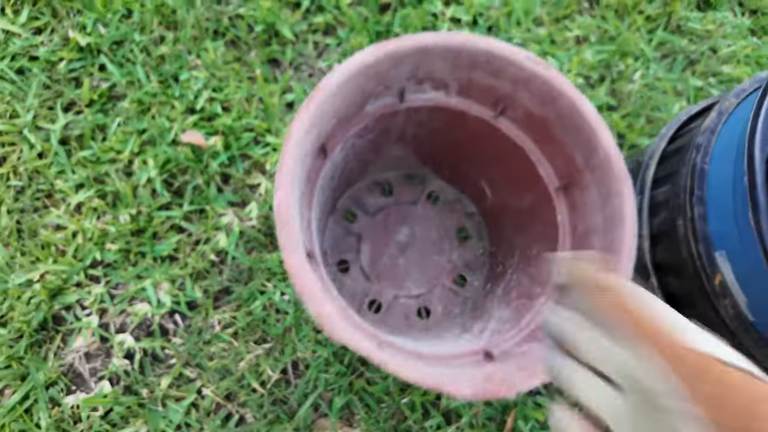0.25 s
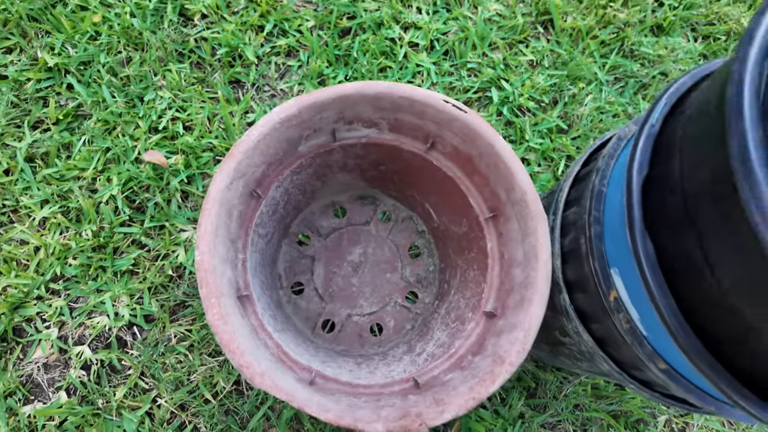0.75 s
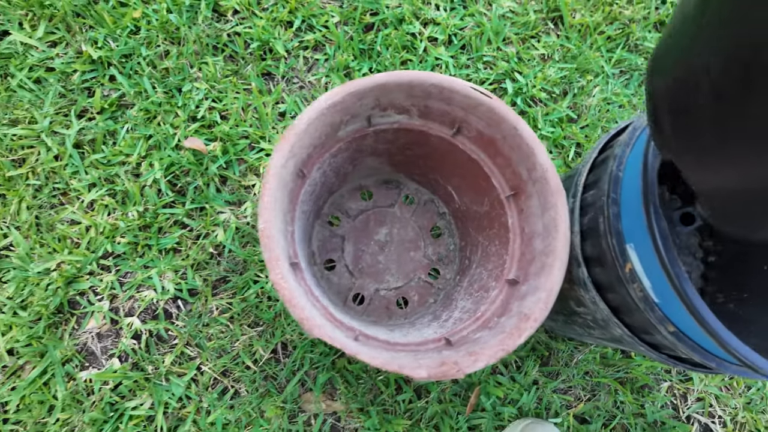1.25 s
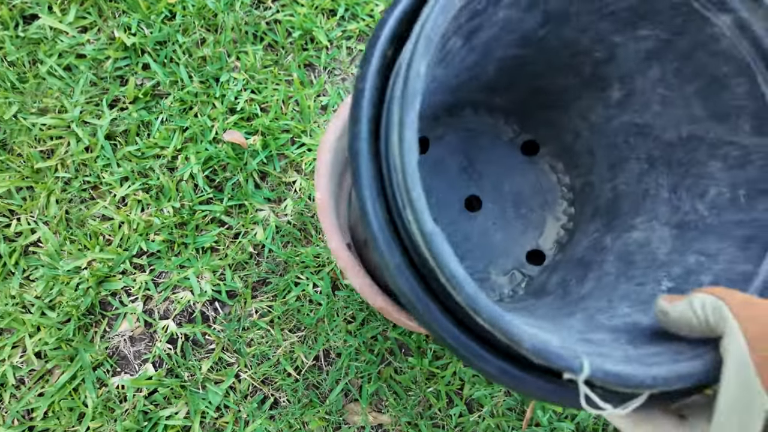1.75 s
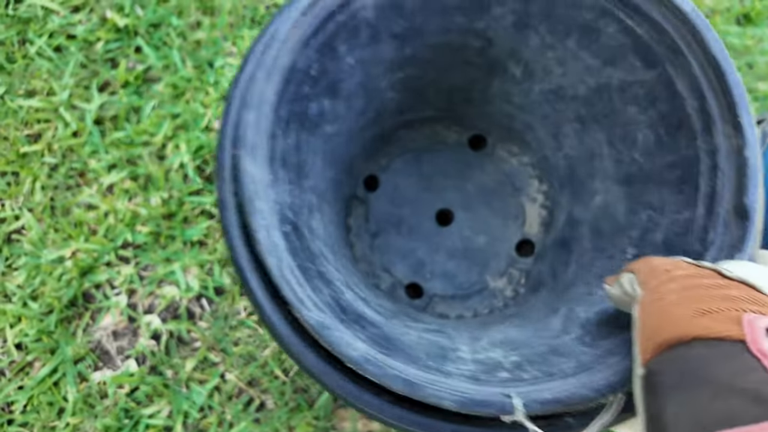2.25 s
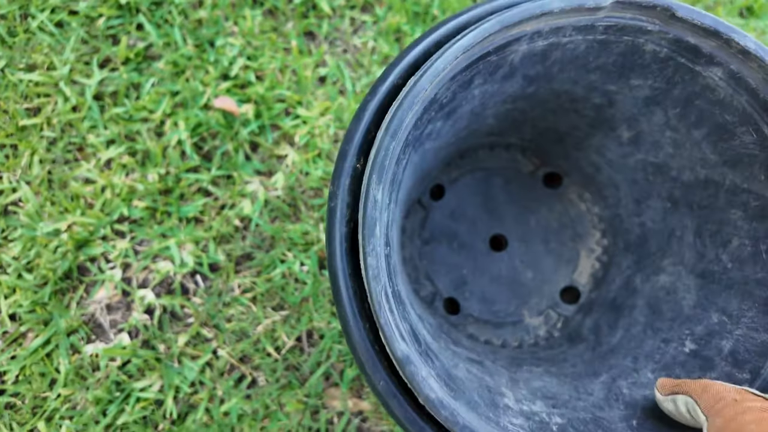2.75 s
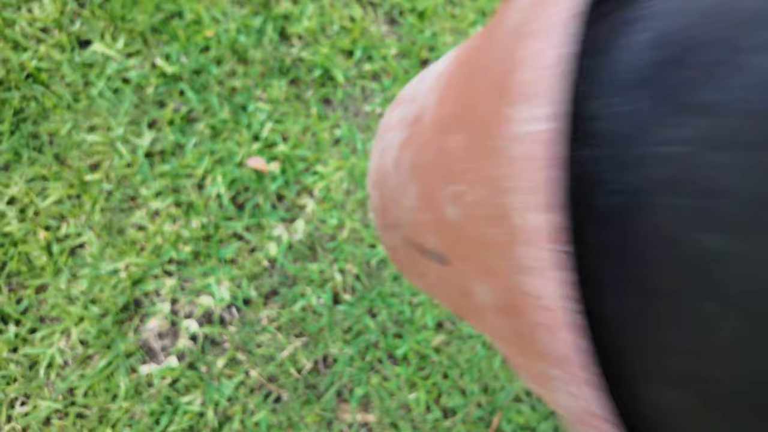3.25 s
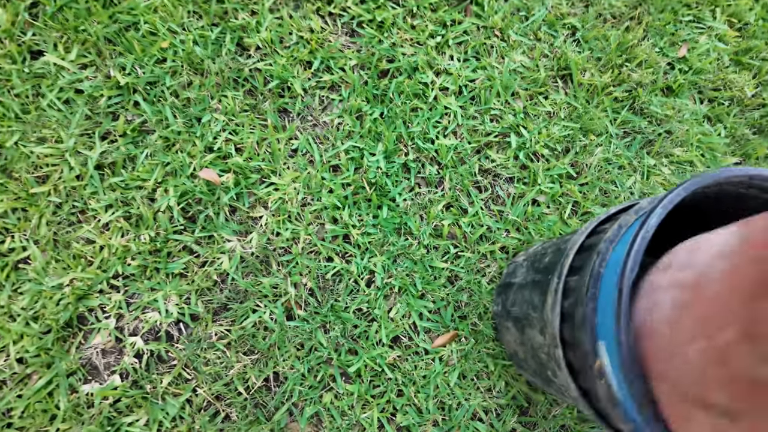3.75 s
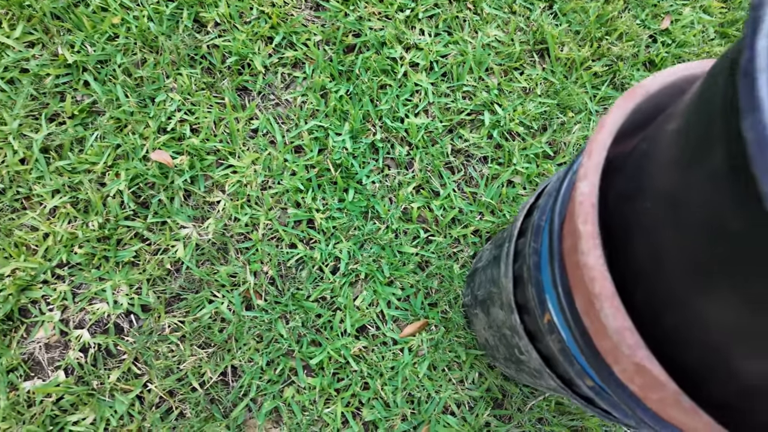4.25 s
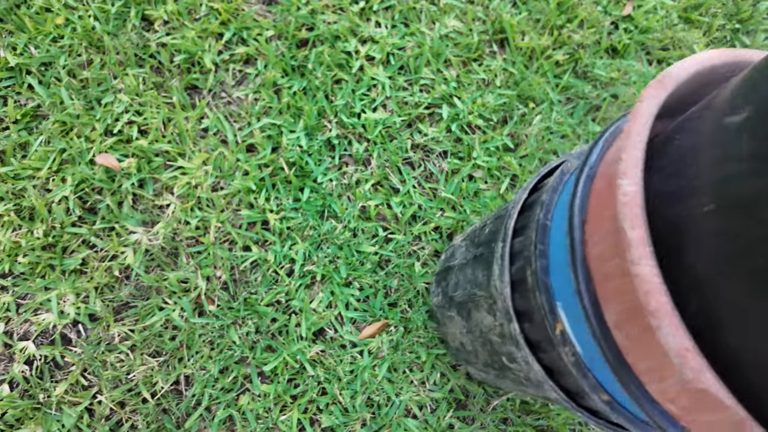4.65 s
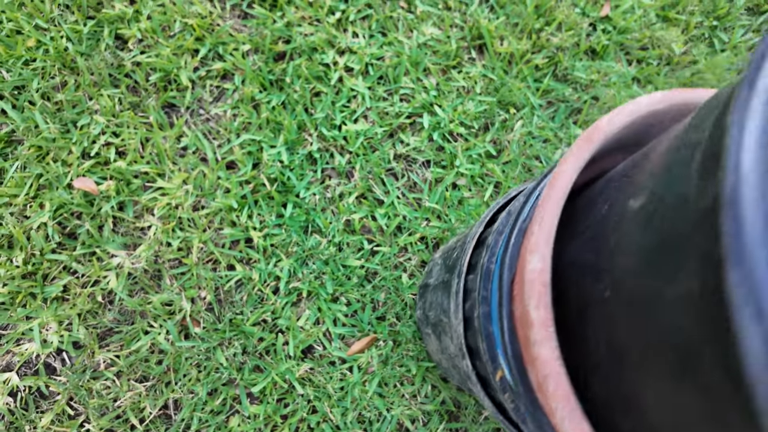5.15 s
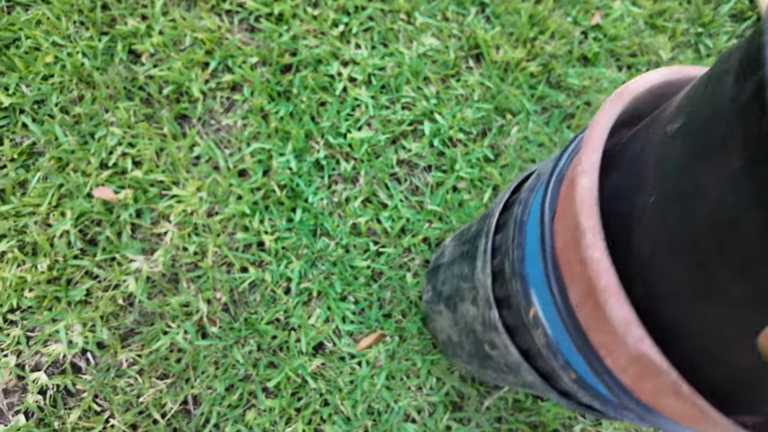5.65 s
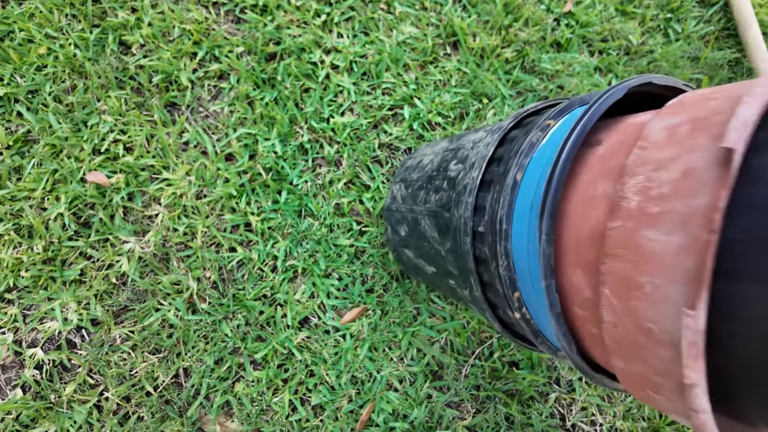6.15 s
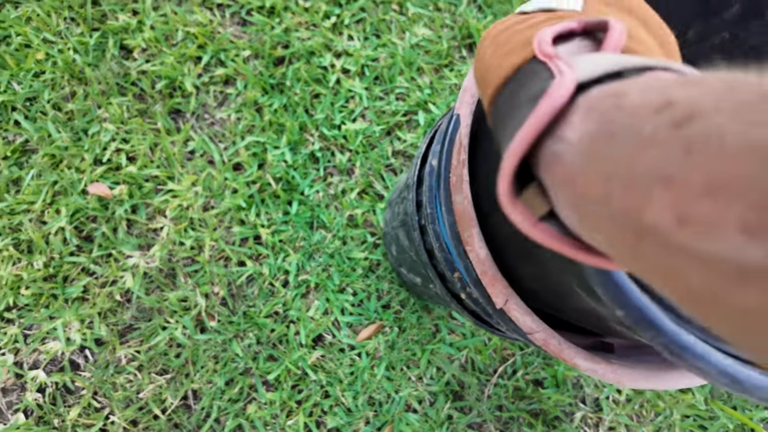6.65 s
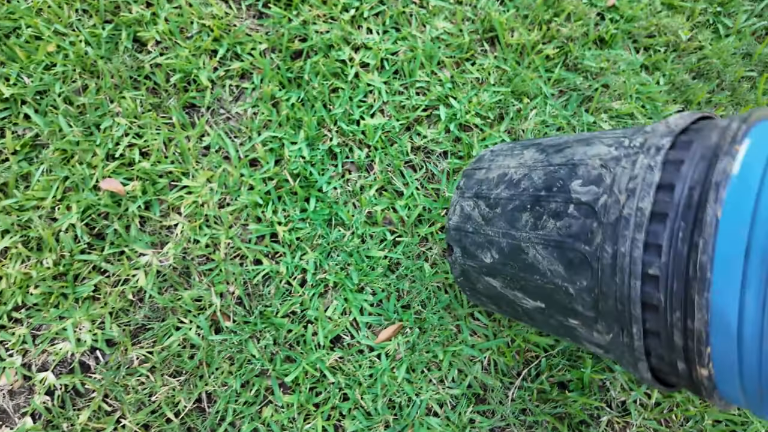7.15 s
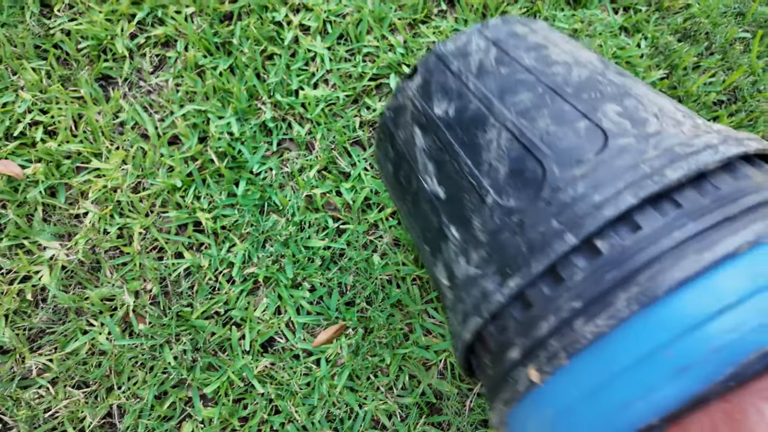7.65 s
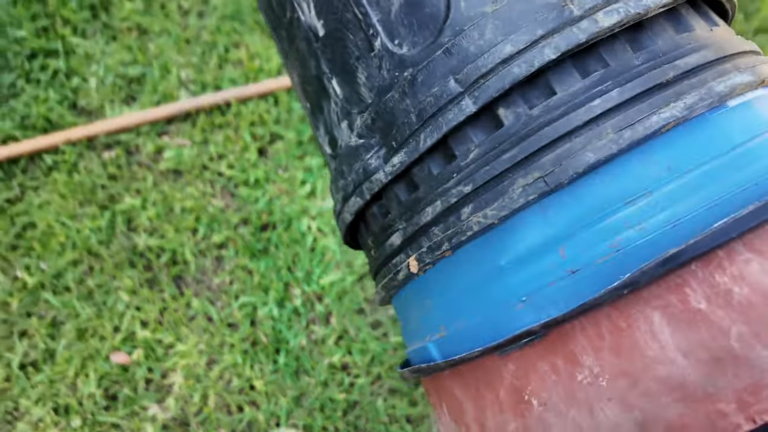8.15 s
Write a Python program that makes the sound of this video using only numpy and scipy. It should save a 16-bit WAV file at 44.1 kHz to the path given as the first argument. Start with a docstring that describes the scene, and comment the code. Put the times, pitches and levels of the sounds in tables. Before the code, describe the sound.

Outdoors on a lawn, closely heard, with a soft distant hum, light low wind and faint gliding bird notes. From 0 to 0.6 s plastic pots scuff and knock quietly. Around 0.9-1.2 s gritty scraping grows with small clacks. At 1.7-1.8 s a pot lands in another: a loud sandy clatter and hollow double boom. Short scrapes with duller knocks follow at 2.2, 2.7 and 3.0 s. Birds chirp faintly around 3.2-3.6 s. At 3.8-4.0 s comes the harshest nesting crash, bright rasp, rim knocks and boom, jolting the microphone. Then it is quiet, with faint rubs and bird notes, until a scrape and hollow knock at 5.3 s. A scrape at 6.0 s leads to a sharp, loud crack and boom at 6.3 s, then fading rustle and ticks. Low wind thuds flutter at 7.1-7.5 s; small dull flicks at 7.7-7.9 s and faint rustling end it.

```python
"""A lawn: gloved hands pull gritty plastic plant pots apart and nest them into a stack.
Walls scrape as grit-driven noise, rims knock and flick as ringing noise and tones, hollow pots boom in
two air modes. Light wind buffets the microphone as low noise and short thuds, over a far outdoor hum of
coloured noise and a few faint, gliding bird notes."""
import sys
import numpy as np
from scipy import signal
from scipy.fft import rfft, irfft
from scipy.io import wavfile
from scipy.ndimage import uniform_filter1d

SR = 44100
rng = np.random.default_rng(int(sys.argv[2]) if len(sys.argv) > 2 else 0)


def dump(signal):
    """Clip the signal to [-1, 1] and save it as 16-bit WAV at the path in sys.argv[1]."""
    limited = np.clip(np.atleast_2d(signal).T, -1, 1)
    pcm = np.round(limited * 32767).astype(np.int16)
    wavfile.write(sys.argv[1], SR, pcm)


def invert_db(level):
    """Linear amplitude ratio for a level in decibels (20 dB per decade), elementwise."""
    return 10 ** (np.asarray(level, dtype=float) / 20)


N = 370873  # length in samples

# Pot walls sliding on each other, a row a stroke; swell and fade each span STROKE_DB.
# Each row: peak time in seconds, level in dB, swell in seconds, fade in seconds, treble tilt in dB per octave.
STROKES = [(0.05, -60.5, 0.33, 0.41, -.6), (0.19, -42, 0.05, 0.11, 3.5), (0.319, -53, 0.11, .08, 5),
           (0.4, -55.5, 0.14, 0.2, 4), (0.59, -49.5, 0.069, .1, 2), (0.66, -58.5, 0.12, 0.35, 2.5),
           (0.84, -46, .1, 0.45, 3.5), (0.935, -41.5, 0.026, 0.15, 1), (0.98, -40, 0.11, 0.052, 2.5),
           (1.031, -34.5, 0.066, 0.018, 0), (1.095, -40, 0.047, 0.2, 2), (1.15, -46.5, 0.12, .05, 2),
           (1.2, -44, .04, 0.024, -2), (1.47, -57.5, 0.26, 0.53, 2.5), (1.703, -27, 0.012, 0.044, 4),
           (1.729, -36, 0.031, 0.014, 2), (1.785, -31, 0.015, 0.14, 2.5), (1.85, -36, 0.15, 0.041, 7),
           (2.0, -51, 0.11, .25, 2), (2.227, -36, 0.063, 0.12, 2), (2.33, -43, 0.11, 0.14, 1.5),
           (2.49, -51, 0.076, .2, 2), (2.725, -36, 0.035, 0.12, 2.2), (2.772, -34.5, 0.11, 0.031, 1),
           (2.823, -46.5, 0.075, 0.038, -3), (2.995, -50, 0.13, 0.11, -1), (3.36, -65.5, 0.54, 0.27, 1),
           (3.62, -60.5, 0.11, 0.15, 0), (3.721, -55, 0.045, 0.26, 2.2), (3.81, -55.5, 0.23, 0.054, 1),
           (3.852, -33.5, 0.02, 0.03, 2), (3.894, -34.5, 0.013, 0.063, 12.5),
           (3.916, -25, 0.024, 0.094, 4.5), (3.97, -29.5, 0.042, 0.051, 4), (4.014, -42.5, 0.045, 0.036, 4),
           (4.11, -62.5, 0.078, 0.57, 12.5), (4.32, -57, 0.23, 0.072, 6), (4.47, -54, 0.18, 0.068, 6),
           (4.7, -62.5, 0.32, 0.25, 7.5), (4.909, -58.5, 0.14, 0.2, 11), (5.113, -65.5, 0.3, 0.45, 10.5),
           (5.311, -35, 0.07, 0.061, 3.5), (5.37, -50.5, 0.045, 0.19, 4.5), (5.62, -65, 0.6, 0.11, 9),
           (5.88, -64.5, 0.75, 0.17, 5.5), (6.016, -38, 0.067, 0.11, 3.5), (6.13, -46, 0.18, 0.073, 8),
           (6.269, -37.5, 0.022, 0.021, 6), (6.305, -41.5, 0.032, 0.047, 6.5),
           (6.376, -46, 0.11, 0.049, 0.3), (6.52, -45, 0.13, 0.19, 5), (6.62, -51, 0.18, 0.14, 5),
           (6.7, -60.5, 0.11, 0.78, 3), (7.144, -66.5, 0.45, 0.28, 12), (7.42, -67, 0.32, 0.31, 5),
           (7.59, -59, 0.16, 0.14, 3.5), (7.69, -56, 0.14, 0.16, 7), (7.81, -61, 0.26, 0.53, 3),
           (8.171, -60.5, 0.3, 0.28, 9.5), (8.4, -57.5, 0.38, .1, 3.5)]
STROKE_DB, STROKE_POWER = 25.5, 1.31  # the level drops as this power of the time from the peak
REST_DB, REST_TILT_DB = -75, -4  # faint rustle of the grip between strokes: level, tilt per octave

# Which pots meet and how deep they nest.
# Each row: time in seconds, wall body under 1 kHz in dB, air in the pot in dB, both against the rub.
NESTING = [(0.0, 7.5, 11), (0.6, 11.5, 23), (0.85, 7, 22.5), (0.95, -4, 15), (1.2, 3, 26), (1.7, 13.5, 31),
           (2.3, 3.5, 28.5), (2.75, 9.5, 26.5), (3.0, 2, 32), (3.9, 6.5, 27.5), (4.4, 7, 25.5),
           (5.1, 7, 11), (5.3, 11.5, 28.5), (6.05, 7.5, 17), (6.55, 10.5, 28), (7.7, -2, 8), (8.41, 8, 27)]

# The patch of wall that the rub excites most.
# Each row: time in seconds, centre in Hz, level of its added peak in dB against the wall around it.
PATCHES = [(0.0, 1300, 4), (0.6, 1600, 2), (0.82, 4170, -19), (1.22, 4180, -2), (1.5, 1630, -3.8),
           (1.9, 1320, -9), (2.3, 2130, -19), (2.75, 1400, -26), (3.9, 1550, -8), (4.25, 2030, 13.5),
           (4.5, 2090, 4), (5.1, 1330, 21.5), (5.3, 1270, -1), (6.1, 3450, -15), (6.55, 1430, -2),
           (7.6, 2740, -4), (7.85, 1190, 9), (8.41, 2030, -4)]

# Average colour of the pot wall. Each row: frequency in Hz, relative density in dB per Hz.
WALL = [(260, -79), (450, -12), (515, -7), (830, -2), (1020, -11.5), (1260, -1.5), (1750, -3), (2010, -4),
        (2290, -3.5), (2550, -5.5), (3490, -6), (4910, -10.5), (6930, -18.5), (10400, -17), (16000, -23.5)]

# Air inside a pot, lower and upper mode. Each row: centre in Hz, width in Hz.
AIR_MODES = [(130, 56), (290, 84)]

# Rims crashing and skidding.
# Each row: time in seconds, nominal peak in dB, ring in Hz, rise in seconds, 60 dB decay in seconds.
KNOCKS = [(0.16, -21.5, 1160, 0.017, 0.29), (0.199, -23.5, 1320, 0.021, 0.1),
          (0.316, -22, 1160, .0096, 0.22), (0.563, -28, 2580, .003, .12), (0.864, -25.5, 650, .011, 0.36),
          (0.927, -20.5, 1560, .006, 0.53), (1.021, -13.5, 1740, 0.0036, 0.051),
          (1.061, -17, 1630, 0.003, 0.033), (1.082, -15, 1800, 0.0024, .054),
          (1.188, -14, 1500, 0.0025, 0.076), (1.693, -5, 1350, 0.0034, 0.089),
          (1.717, -12, 1380, 0.0066, .037), (1.76, -3, 800, 0.0035, 0.086),
          (1.779, -8.5, 720, 0.0045, 0.21), (2.212, -16.5, 950, .005, 0.1),
          (2.468, -22, 2640, 0.0049, 0.071), (2.699, -33, 756, .011, .12), (2.716, -9.5, 490, 0.01, 0.036),
          (2.98, -22.5, 890, 0.0022, 0.097), (3.047, -27, 750, .007, 0.089), (3.835, -8, 3430, .003, 0.065),
          (3.848, -11, 3660, 0.0041, .048), (3.886, -10, 3560, 0.0035, 0.53),
          (3.906, -4, 1280, 0.0033, 0.14), (3.918, -8, 1250, .003, 0.068), (3.956, -3, 570, 0.0032, 0.094),
          (4.003, -7.5, 1410, 0.0056, 0.045), (4.289, -43, 2100, 0.03, 0.63),
          (4.439, -33.5, 2220, 0.026, 0.37), (5.058, -34.5, 1000, 0.036, 0.43),
          (5.24, -31, 650, 0.0084, 0.27), (5.292, -13.5, 1270, .006, .11), (5.311, -13, 1530, 0.0081, 0.1),
          (5.973, -26, 1380, 0.014, 0.25), (6.011, -18.5, 1290, 0.013, 0.2), (6.089, -23, 4670, .011, 0.4),
          (6.261, -15, 950, 0.0026, 0.11), (6.271, -12.5, 4230, 0.0031, 0.034),
          (6.318, -1, 1360, 0.0025, 0.057), (6.329, -6.5, 2660, 0.0025, 0.053), (6.514, -27, 780, .01, .1),
          (7.802, -42, 1170, 0.034, 0.15)]
CREST_DB = 17.5  # nominal peak over rms of gritty noise
SHARP_TILT_DB, DULL_DB_PER_MS = 1, 0.29  # tilt per octave; the slower a blow lands, the duller it is

# Single grains and rim flicks.
# Each row: start in seconds, level in dB before a common cut, ring in Hz, crack in dB before a common lift.
TICKS = [(1.001, -16, 1260, -27), (1.088, -25.5, 1650, 6), (1.125, -16.5, 1320, -5),
         (1.23, -19.5, 1650, -8), (1.776, -6, 640, -1), (1.908, -33, 2750, -1), (1.925, -36, 1240, 4),
         (1.978, -34.5, 2350, -4), (2.25, -20.5, 1560, -3), (2.291, -32, 2180, -9), (2.309, -33, 3680, 2),
         (2.341, -30, 2140, 5), (2.374, -36.5, 1510, 2), (2.471, -30, 2650, -2), (2.811, -24.5, 634, -2),
         (3.052, -21, 710, -27), (3.357, -35, 3560, 6.5), (3.703, -33, 1950, -8), (3.721, -38, 1660, -3),
         (3.792, -42, 1810, -3), (4.061, -42, 1190, 10.5), (5.079, -36, 611, -21), (5.088, -43, 1250, -25),
         (5.102, -36, 1260, -28), (5.414, -29.5, 4450, -2.5), (5.749, -43, 950, 3), (6.221, -49, 1350, 12),
         (6.414, -30.5, 1830, -1), (6.469, -35, 1860, 4), (6.539, -31, 1420, -4), (6.568, -45, 900, 12),
         (6.668, -41, 4020, 6), (6.726, -42, 5480, 3), (6.737, -34.5, 2870, 3), (6.745, -29.5, 2020, -6),
         (6.779, -30, 654, -5.5), (7.56, -39, 2820, -3), (7.574, -39, 2480, -6), (7.649, -32, 2600, -17),
         (7.688, -35, 5300, -1), (7.751, -27.5, 598, -12.5), (7.778, -24.5, 670, -14),
         (7.794, -27.5, 600, -9), (7.832, -21.5, 595, -9.5), (7.859, -49, 3300, 3), (7.881, -34, 600, -14),
         (8.167, -35, 870, -8), (8.223, -35.5, 1990, 2.5)]
TICK_T60 = .03  # seconds, for a partial at 1 kHz; shorter above, longer below

# Partials of a flicked rim. Each row: multiple of its ring, starting level in dB.
RIM = [(1, 0), (1.97, -3), (3.03, -9)]

# Pots landing in pots; the upper mode shifts with the air left between them.
# Each row: time in seconds, nominal peak in dB, share of the upper air mode from 0 to 1,
# 60 dB decay in seconds, upper mode in Hz.
BOOMS = [(1.004, -27, 0.5, 0.42, 215), (1.699, -12.5, 0.43, 0.32, 260), (1.77, 3, 0.66, 0.098, 305),
         (1.784, 0.5, 0.56, .11, 310), (1.808, -1.5, 0.98, 0.066, 278), (2.21, -15.5, 0.64, 0.071, 210),
         (2.708, -23, 0.77, 0.23, 296), (2.76, -24.5, 0.69, 0.23, 281), (2.994, -29.5, 0.67, 0.23, 281),
         (3.744, -25, .3, .22, 285), (3.842, -11, 0.72, 0.069, 293), (3.913, -16.5, 0.6, .21, 234),
         (3.929, -17, 0.63, .21, 328), (3.959, -4.5, 0.68, .14, 270.3), (5.312, -12.5, 0.49, 0.098, 290),
         (5.999, -24.5, 0.59, 0.15, 214), (6.268, -14, 0.42, 0.068, 213), (6.32, -10, 0.95, 0.059, 263),
         (6.333, -0.5, 0.41, 0.089, 270.6), (6.512, -28.5, 0.66, 0.14, 270)]

# Low rumble of wind. Each row: time in seconds, level in dB.
GUSTS = [(0.0, -50), (0.54, -45.5), (0.9, -48.5), (1.6, -47.5), (2.5, -48.5), (2.88, -49.5), (3.25, -51),
         (3.54, -54), (3.72, -43.5), (4.3, -51.5), (5.25, -44), (5.6, -49), (6.35, -45.5), (6.56, -42),
         (6.86, -50.5), (7.2, -43.5), (7.42, -45.5), (7.61, -52.5), (8.0, -47.5), (8.41, -53.5)]

# Colour of the wind rumble. Each row: frequency in Hz, relative density in dB per Hz.
WIND = [(20, -60), (45, -21), (70, 3.5), (120, -1), (200, -6.5), (300, -10.5), (500, -64), (900, -76)]

# Heavy landings that shake the microphone. Each row: peak time in seconds, level in dB.
JOLTS = [(3.912, -14), (6.322, -24.5)]
JOLT_RISE_S, JOLT_T60 = 0.053, 0.15  # seconds, each over 60 dB

# Single wind thuds. Each row: time in seconds, nominal peak in dB, pitch in Hz.
BUFFETS = [(4.962, -27, 81.4), (4.997, -28.5, 112), (5.086, -36, 111), (6.789, -31.5, 67),
           (7.132, -29.5, 110), (7.153, -25, 98), (7.185, -21.5, 75), (7.229, -28.5, 75.4),
           (7.291, -28, 64), (7.32, -43, 88), (7.377, -24, 91), (7.44, -29.5, 72), (7.516, -27, 81)]

# Faint bird notes. Each row: start in seconds, length in seconds, first pitch in Hz, last pitch in Hz,
# level in dB around which it flutters.
BIRD = [(0.019, .065, 3650, 2300, -63), (0.058, .025, 3850, 3950, -62), (0.101, .055, 2600, 3600, -63),
        (1.355, .045, 3800, 2400, -60), (1.4, .025, 2650, 2950, -56), (2.644, .03, 2900, 2950, -59),
        (3.172, .03, 2600, 3100, -60), (3.21, .03, 6200, 4400, -73), (3.238, .014, 4400, 3100, -62),
        (3.27, .025, 3500, 2600, -62), (3.3, .014, 2700, 3750, -61), (3.31, .016, 3750, 2900, -62),
        (3.368, .03, 2750, 3050, -64), (3.392, .045, 3050, 2950, -67), (3.412, .03, 6100, 4200, -70),
        (3.438, .012, 4450, 3250, -61), (3.445, .018, 3300, 4200, -61), (3.458, .038, 4200, 2800, -60),
        (3.57, .03, 2750, 2950, -62), (4.228, .055, 3850, 4250, -60), (4.645, .05, 3700, 4350, -61),
        (4.879, .047, 3850, 4200, -59), (5.089, .075, 3300, 4200, -61), (5.581, .06, 3900, 4350, -60),
        (5.65, .035, 4280, 4300, -66)]
BOW = .3  # mid-note the pitch lies above the straight glide by this share of the glide

# Colour of the far outdoor hum. Each row: frequency in Hz, relative density in dB per Hz.
HUM = [(12, -28), (20, -11), (107, 0.5), (255, -11.5), (434, -21.5), (485, -17), (678, -16.5), (897, -14.5),
       (976, -15.5), (1660, -22), (2320, -29), (3070, -41), (6910, -39.5), (16000, -44)]
HUM_DB = -51.5


def evened(x):
    """Scales to rms 1."""
    return x / np.sqrt(np.mean(x ** 2) + 1e-20)


def drift(length, size):
    """Slow random wander of rms 1, smoothed twice over size samples."""
    noise = rng.standard_normal(length)
    return evened(uniform_filter1d(uniform_filter1d(noise, size=size), size=size))


def patchy(noise, bands, frames):
    """Smooths noise over bands and frames into drifting spectral patches of rms 1."""
    return evened(uniform_filter1d(uniform_filter1d(noise, size=bands, axis=0), size=frames, axis=1))


def read(points, hz):
    """Reads a spectrum on a log-frequency axis."""
    f, value = np.transpose(points)
    return np.interp(np.log(hz + 1), np.log(f + 1), value)


def add(mix, s, sound):
    """Mixes a sound in at time s."""
    part = mix[round(s * SR):][:len(sound)]
    part += sound[:len(part)]


def bump(hz, centre_hz, width_hz):
    """Magnitude of one resonance, 1 at its centre."""
    return 1 / np.sqrt(1 + (2 * (hz - centre_hz) / width_hz) ** 2)


def wall_colour(hz, tilt_db, ring_hz, ring_db, body_db=0):
    """The pot wall: average colour, treble tilt about 3 kHz, low body and one ringing patch."""
    tilt = tilt_db * np.clip(np.log2((hz + 1) / 3000), -1.2, 1.5)
    body = body_db / (1 + (hz / 1000) ** 6)
    patch = 1 + invert_db(ring_db) * bump(hz, ring_hz, 0.22 * ring_hz)
    gain = invert_db(read(WALL, hz) + tilt + body) * patch
    mids = (hz > 1000) * (hz < 5000)
    return gain / np.sqrt((mids * gain ** 2).mean(0))  # level set by the mids


def grit(length, per_s, spread_db, smooth):
    """Sand grains catching: clumped clicks of uneven size over a smooth hiss."""
    luck = rng.random(length)
    size = rng.exponential(1, length)
    hiss = rng.standard_normal(length)
    clicks = (luck < per_s / SR) * np.sign(hiss) * invert_db(spread_db * np.minimum(size, 4))
    clumps = invert_db(2.27 * drift(length, 300))
    return evened((smooth * hiss + (1 - smooth) * evened(clicks)) * clumps)


def pings(per_s, spread_db, cycles):
    """Larger grains, each ringing one small patch of wall at its own pitch."""
    size = (rng.random(N) < per_s / SR) * invert_db(spread_db * np.minimum(rng.exponential(1, N), 4))
    pitches = np.geomspace(900, 6000, num=28)
    patch = rng.integers(0, len(pitches), N)
    t, out = np.arange(1500) / SR, np.zeros(N)
    for k, hz in enumerate(pitches):
        ring = np.sin(2 * np.pi * hz * t) * np.exp(-t * np.sqrt(hz * 1500) / cycles)
        out += signal.oaconvolve(size * (patch == k), np.sqrt(hz) * ring)[:N]
    return evened(out)


def strokes(t):
    """Level of all strokes together in dB, and their tilt averaged by power."""
    s, db, swell, fade, tilt_db = np.transpose(STROKES)[:, :, None]
    before = (s - t) / np.maximum(swell, .005)
    after = (t - s) / np.maximum(fade, .005)
    away = np.where(t < s, before, after)
    power = invert_db(db - STROKE_DB * away ** STROKE_POWER) ** 2
    rest = invert_db(REST_DB) ** 2
    total = power.sum(0) + rest
    return 10 * np.log10(total), ((power * tilt_db).sum(0) + rest * REST_TILT_DB) / total


def rub():
    """Grit between sliding walls, coloured by the wall and by the air in the pot."""
    drive = grit(N, 2000, 3.8, .5) + invert_db(-5) * pings(1800, 2.5, 4.5)
    hz, t, z = signal.stft(evened(drive), SR, nperseg=512, noverlap=384)
    rub_db, tilt_db = strokes(t)
    s, *columns = np.transpose(NESTING)
    body_db, air_db = (np.interp(t, s, c) for c in columns)
    s, *columns = np.transpose(PATCHES)
    ring_hz, ring_db = (np.interp(t, s, c) for c in columns)
    hz = hz[:, None]
    air = sum(bump(hz, f, w) ** 2 for f, w in AIR_MODES)
    colour = wall_colour(hz, tilt_db, ring_hz, ring_db, body_db) + invert_db(air_db) * air
    # the contact wanders over patches that ring differently
    spots = patchy(rng.standard_normal(z.shape), 3, 10)
    colour = colour * invert_db(1.7 * spots)
    return signal.istft(z * colour * invert_db(rub_db), SR, nperseg=512, noverlap=384)[1][:N]


def knocks():
    """Each crash swells, skids a moment and dies away in the wall."""
    out, t = np.zeros(N), np.arange(12000) / SR
    hz = np.fft.rfftfreq(len(t), 1 / SR)
    for s, peak_db, ring_hz, rise, t60 in KNOCKS:
        tilt_db = SHARP_TILT_DB - DULL_DB_PER_MS * rise * 1000
        colour = wall_colour(hz, tilt_db, ring_hz, 9.8)
        colour = colour * invert_db(1.8 * drift(len(hz), 30))  # each struck spot has its own close modes
        noise = irfft(rfft(grit(len(t), 3000, 5.8, 0.52)) * colour)
        rise, t60 = max(rise, .0005), max(t60, .01)
        skid = 0.034 * t60
        swell = np.minimum(t / rise, 1) ** 2
        fall = invert_db(-60 * np.maximum(t - rise - skid, 0) / t60)
        add(out, s - .6 * rise, invert_db(peak_db - CREST_DB) * noise * fall * swell)
    return out


def ticks():
    """A short crack, while the struck patch rings with its overtones."""
    out, t = np.zeros(N), np.arange(4000) / SR
    hz = np.fft.rfftfreq(len(t), 1 / SR)
    for s, level_db, ring_hz, crack_db in TICKS:
        ring = np.zeros(len(t))
        for multiple, db in RIM:
            partial_hz = multiple * ring_hz
            if partial_hz < 9000:
                fall_db = 60 * np.sqrt(partial_hz / 1000) * t / TICK_T60
                ring += invert_db(db - fall_db) * np.sin(2 * np.pi * partial_hz * t)
        colour = wall_colour(hz, 0.17, 1.47 * ring_hz, 4.6, -2.5)
        noise = irfft(rfft(rng.standard_normal(len(t))) * colour)
        crack = noise * invert_db(crack_db + 2.0 - 90 * t / TICK_T60)
        add(out, s, invert_db(level_db - 5.5) * (ring + crack) * np.minimum(t / 0.0014, 1))
    return out


def booms():
    """A soft push of a few ms sets the two air modes ringing; the rattling walls roughen them."""
    out, t = np.zeros(N), np.arange(16000) / SR
    for s, peak_db, upper, t60, upper_hz in BOOMS:
        upper = np.clip(upper, 0, 1)
        lower_hz = AIR_MODES[0][0] * rng.uniform(0.834, 1.2)
        low, high = (np.sin(2 * np.pi * hz * t) for hz in (lower_hz, upper_hz))
        rattle = 1 + 0.27 * drift(len(t), 60)
        swell = (1 - np.exp(-t / 0.0076)) * invert_db(-60 * t / max(t60, .02))
        add(out, s - .002, invert_db(peak_db) * swell * rattle * ((1 - upper) * low + upper * high))
    return out


def coloured(points, patchy_db):
    """Noise of a given spectrum with drifting patches."""
    hz = np.fft.rfftfreq(2048, 1 / SR)
    real, imaginary, noise = rng.standard_normal((3, len(hz), N // 512 + 5))
    gain = invert_db(read(points, hz)[:, None] + patchy_db * patchy(noise, 20, 8))
    z = (real + 1j * imaginary) * gain
    return evened(signal.istft(z, nperseg=2048, noverlap=1536)[1][:N])


def wind():
    """Lumpy low rumble, surging where landings shake the microphone, with short low thuds."""
    s, gust_db = np.transpose(GUSTS)
    lumps = invert_db(3.7 * evened(uniform_filter1d(rng.standard_normal(N), size=1500)))
    t = np.arange(N) / SR
    level = invert_db(np.interp(t, s, gust_db))
    for at, db in JOLTS:
        level += invert_db(db - 60 * np.maximum((at - t) / JOLT_RISE_S, (t - at) / JOLT_T60))
    out = level * evened(lumps * coloured(WIND, 2.2))
    for s, peak_db, hz in BUFFETS:
        turns = np.arange(0, 1.8, hz / SR)  # just under two cycles
        push = np.sin(2 * np.pi * turns) + 0.19 * np.sin(2 * np.pi * 2.34 * turns)
        add(out, s + 0.0034, invert_db(peak_db) * push * np.hanning(len(turns)))
    return out


def bird():
    """Thin whistles that glide in a bow and flutter with distance."""
    out = np.zeros(N)
    for s, length, first_hz, last_hz, db in BIRD:
        u = np.linspace(0, 1, round(length * SR))
        glide = last_hz - first_hz
        pitch = first_hz + glide * u + BOW * abs(glide) * np.sin(np.pi * u)
        whistle = np.sin(2 * np.pi * np.cumsum(pitch) / SR)
        add(out, s, invert_db(db) * whistle * signal.windows.tukey(len(u), .5))
    return out * invert_db(1.5 * drift(N, 200))


def hum():
    """Far outdoor hum: steady coloured noise whose spectrum drifts in patches."""
    return invert_db(HUM_DB) * coloured(HUM, 2.66)


def scene():
    """All sources at one microphone."""
    pots = rub() + knocks() + ticks() + booms()
    return (pots + wind() + bird() + hum())[None]


def band_limit(x):
    """A steep low-pass at the top of the band."""
    return signal.sosfilt(signal.butter(12, 16820, fs=SR, output="sos"), x)


def record(dry):
    """The microphone cuts the deep bass, a steep filter the top."""
    cut = signal.sosfilt(signal.butter(3, 55, "high", fs=SR, output="sos"), dry)
    edge = signal.firwin(255, 15900, window=("kaiser", 7), fs=SR)
    mix = signal.oaconvolve(cut, edge[None], "same")
    return band_limit(mix)


dry = scene()
out = record(dry)
dump(out)
```